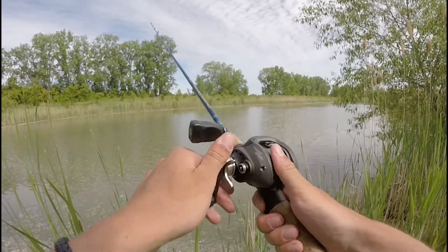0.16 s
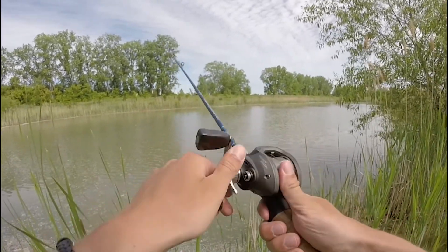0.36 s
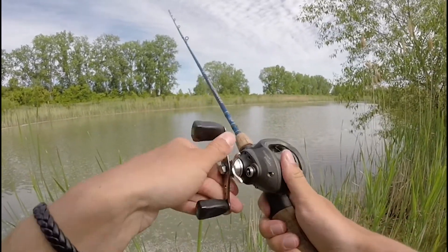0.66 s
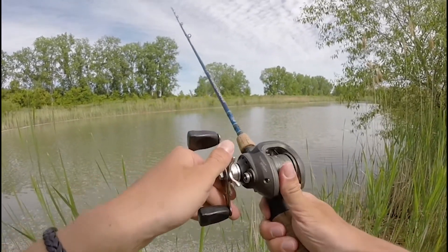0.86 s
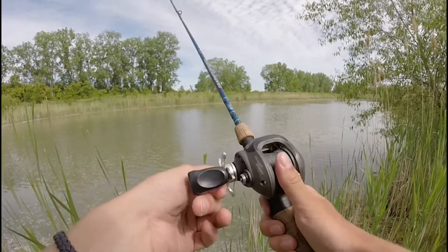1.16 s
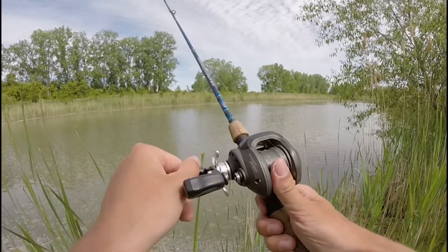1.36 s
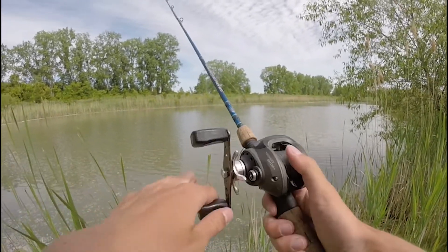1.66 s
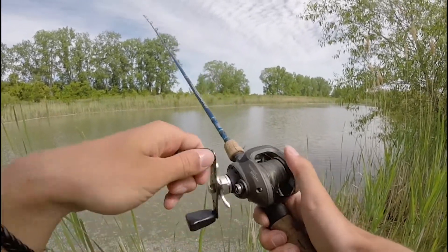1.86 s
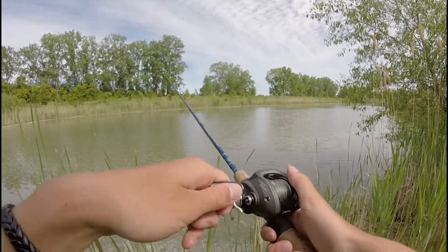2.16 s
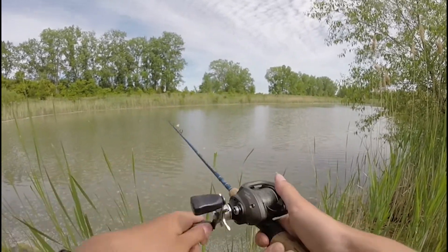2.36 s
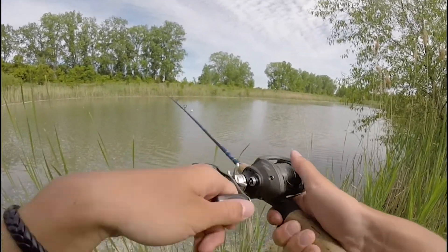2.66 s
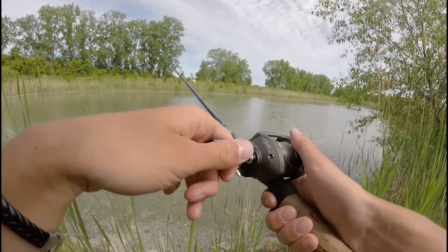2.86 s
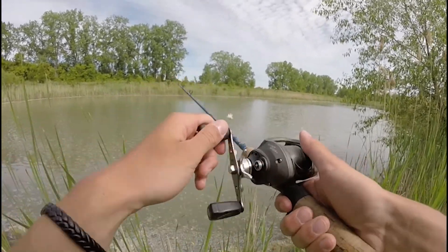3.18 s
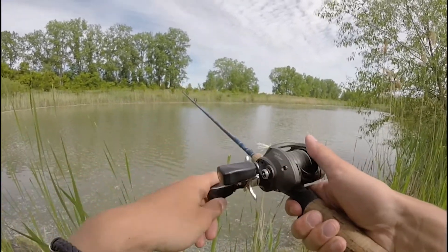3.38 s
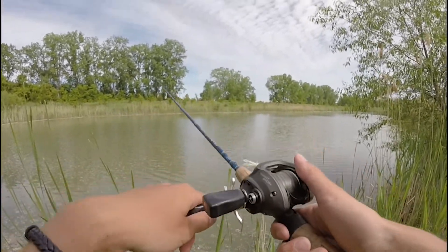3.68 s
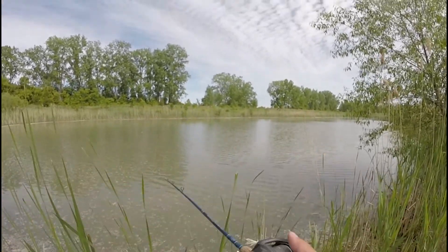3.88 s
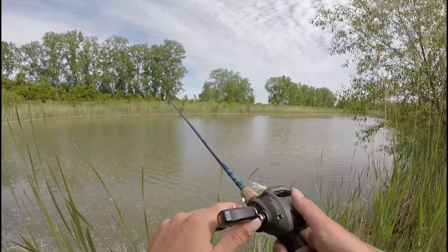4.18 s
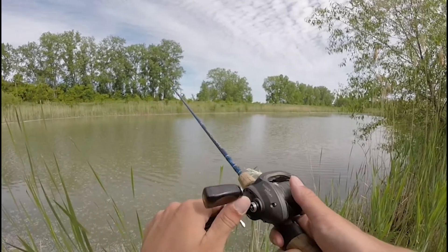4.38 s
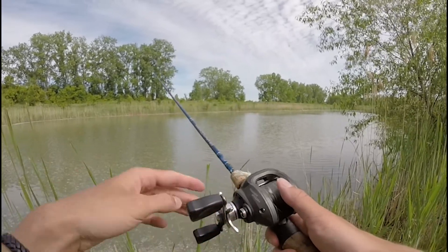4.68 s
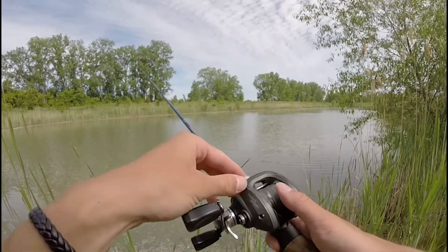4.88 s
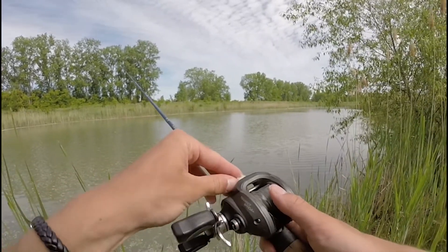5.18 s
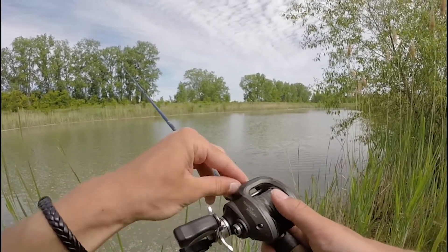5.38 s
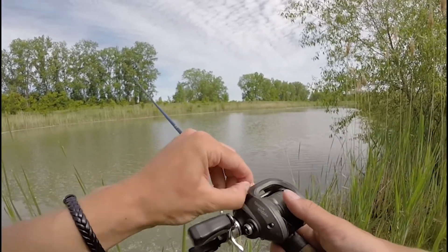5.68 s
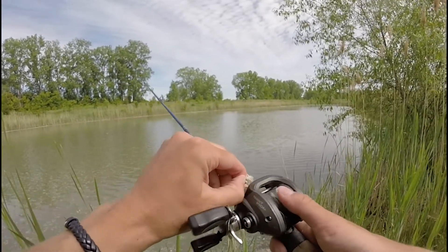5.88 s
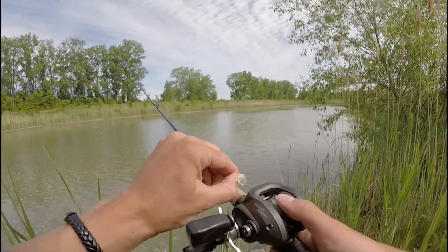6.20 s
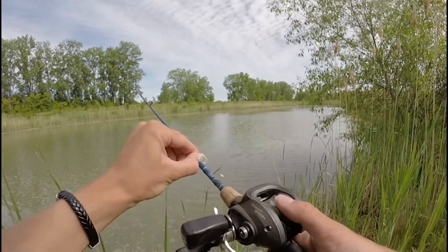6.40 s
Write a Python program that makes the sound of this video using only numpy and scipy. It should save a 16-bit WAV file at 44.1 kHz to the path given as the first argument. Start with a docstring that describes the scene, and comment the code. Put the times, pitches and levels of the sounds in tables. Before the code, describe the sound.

A close, dry outdoor scene by a pond, with soft, low-weighted air hiss throughout. A reel handle knocks against jammed gears at about 0.15, 0.4, 0.6, 0.85, 1.07 and 1.39 s; each is a short hard clack with tiny jostling, the fifth loudest with a stuttering rattle. Light ticks cluster from 1.47 to 1.63 s, then a bright, sharp snap at 1.65 s. The spool's grainy whirr grows until 2.1 s, briefly squealing thinly, and fades by about 2.6 s; a soft hollow plop sounds at 1.94 s. Line rasps faintly near 2.15 and 2.4 s. Distant birds whistle at 2.25-2.85 s. A shorter, weaker whirr and rasp come at 3.2-3.35 s. A nearer bird chirps at 4.3 and more clearly at 4.4 s. Faint ticks and thin line crackle occur near 5.0 and 5.7-5.9 s, then small bird notes from 6.1 to 6.5 s.

```python
"""At the edge of a pond, a baitcasting reel is worked by hand close to a body-worn microphone.
The handle knocks on jammed gears, the thumb bar snaps and fingers tick: strikes ring the frame's modes.
The spool whirrs and the line rasps and crackles as resonant noise; a soft plop is a short sine burst.
Small birds call in gliding tones over shaped noise, the faint hiss of air and leaves."""
import sys
import numpy as np
from scipy import signal
from scipy.fft import rfft, irfft
from scipy.io import wavfile
from scipy.ndimage import uniform_filter1d

SR = 44100
rng = np.random.default_rng(int(sys.argv[2]) if len(sys.argv) > 2 else 0)


def dump(signal):
    """Clip the signal to [-1, 1] and save it as 16-bit WAV at the path in sys.argv[1]."""
    limited = np.clip(np.atleast_2d(signal).T, -1, 1)
    pcm = np.round(limited * 32767).astype(np.int16)
    wavfile.write(sys.argv[1], SR, pcm)


N = 288458
TIME = np.arange(N) / SR


def undb(db):
    """Decibels to gain."""
    return 10 ** (np.asarray(db) / 20)


def level(x, db):
    """Set the rms level."""
    return x * undb(db) / np.sqrt(np.mean(x ** 2))


def add(out, start_s, x):
    """Mix a sound in at its start time."""
    i = int(start_s * SR)
    out[i:i + len(x)] += x[:len(out) - i]


def walk(rate):
    """Slow chance: random levels held 1 / rate s and slewed twice, rms 1."""
    hold = int(SR / rate)
    steps = np.repeat(rng.standard_normal(N // hold + 1), hold)
    slewed = uniform_filter1d(uniform_filter1d(steps, hold), hold)
    return level(slewed[:N], 0)


def colour(x, points):
    """Shape a sound's spectrum by (Hz, dB) points."""
    hz, db = np.transpose(points)
    bins_hz = np.maximum(np.arange(len(x) // 2 + 1) * SR / len(x), 1)
    gain = undb(np.interp(np.log(bins_hz), np.log(hz), db))
    return irfft(rfft(x) * gain, len(x))


def resonate(x, hz, width_hz):
    """Two-pole resonance, gain 1 at the centre."""
    return signal.lfilter(*signal.iirpeak(hz, hz / width_hz, fs=SR), x)


def noise_band(hz, width_hz, drive=1):
    """Noise of a given drive through a steep resonance."""
    noise = drive * rng.standard_normal(N)
    return resonate(resonate(noise, hz, width_hz), hz, width_hz)


def scatter(x, decay_s):
    """Dense little reflections that die away."""
    t = TIME[:SR // 3]
    echoes = rng.standard_normal(len(t)) * np.exp(-t / decay_s) * (t > .002)
    return signal.fftconvolve(x, echoes / np.linalg.norm(echoes))[:N]


def friction(rate, spread_db):
    """Dense tiny slips of uneven size, rate per second."""
    slips = rng.random(N) < rate / SR
    return slips * rng.standard_normal(N) * undb(spread_db * rng.standard_normal(N))


def swells(rows):
    """Gain over time: each row rises to its peak and falls away."""
    gain = 0
    for peak_s, attack_s, release_s, level_db in rows:
        gain = gain + undb(level_db) * np.interp(TIME - peak_s, [-attack_s, 0, release_s], [0, 1, 0])
    return gain


# spectral shape of the outdoor hiss, as density per Hz: pitch_hz, level_db
HISS_SHAPE = [(15, -7), (45, 1), (120, -3), (300, -7.5), (520, -7.5), (760, -5), (1050, -14), (1650, -24),
              (2450, -19.5), (3300, -24.5), (3800, -30.5), (4900, -31), (8000, -41), (15000, -50)]
HISS_DB = -46.5  # rms before the slow swell


def air(swell_db=-0.32, whine_hz=10350, whine_waver=.012, whine_db=-86, hum_db=-65):
    """Steady outdoor hiss as shaped noise, a faint low hum and a thin wavering whine."""
    hiss = level(colour(rng.standard_normal(N), HISS_SHAPE), HISS_DB) * undb(swell_db * walk(2.71))
    hum = noise_band(hz=167.6, width_hz=10)
    whine_pitch = whine_hz * (1 + whine_waver * walk(25) + 0.0017 * walk(500))
    whine = np.sin(2 * np.pi * np.cumsum(whine_pitch) / SR) * undb(3.4 * walk(25.11))
    return hiss + level(hum, hum_db) + level(whine, whine_db)


LEAD = SR // 50  # samples of room for sliding before each strike
# modes of the reel's frame and side plates: pitch_hz, t60_s, strike_db (relative, before tilt and scatter)
FRAME_MODES = [(160, 0.02, -26), (409, 0.039, -25), (638, 0.011, -13), (801, 0.013, -7), (1040, 0.0083, -3),
               (1296, 0.0074, -11.5), (1440, 0.007, -21.5), (2070, 0.0032, -10.5), (2434, 0.018, -11),
               (2750, 0.13, -38.5), (2865, 0.0082, -2.5), (3150, 0.011, -12.5), (4790, 0.0075, -5),
               (4994, .01, -12), (5040, 0.046, -30), (5630, 0.0084, -11), (5860, 0.012, -18.5),
               (6700, 0.0061, -9), (7100, 0.046, -44.5), (7945, .005, -12), (9700, 0.0033, -6.5),
               (10250, .004, -13), (12200, 0.0074, -19.5), (13600, 0.0023, -15.5), (13780, 0.009, -18),
               (14620, 0.0044, -25)]


def click(part_hz, treble_db, bass_db, rattle_db, rattle_s, part_db=1, part_t60=0.0078,
          contact_s=0.00053, scatter_db=3.37, grip=.1, treble_hz=3000, bass_hz=2000,
          slide_db=-16, slide_s=0.0021, snap=3, rebound_hz=8000, uneven_db=4):
    """Parts slide together, strike and chatter for a few ms; this rings the struck part and the frame."""
    t = TIME[:SR // 8]
    hz, t60, db = np.array([*FRAME_MODES, (part_hz, part_t60, part_db)]).T
    # hard contacts reach the high modes, heavy ones shake the whole frame (tilts in dB per octave)
    db = db + treble_db * np.maximum(np.log2(hz / treble_hz), 0)
    db = db + bass_db * np.maximum(np.log2(bass_hz / hz), 0)
    # the changing grip shifts the damped modes most
    db = db + scatter_db * rng.standard_normal(len(hz))
    hz = hz + grip / t60 * rng.standard_normal(len(hz))
    decays = np.exp(-np.log(1000) * np.outer(1 / t60, t))
    ring = undb(db) @ (np.sin(2 * np.pi * np.outer(hz, t)) * decays)
    ring *= 1 - np.exp(-t / contact_s)

    since = t - LEAD / SR
    grit = rng.standard_normal(len(t)) * undb(uneven_db * rng.standard_normal(len(t)))
    slide = grit * np.exp(-abs(since) / slide_s) * (since < 0)
    chatter = grit * np.exp(-abs(since) / rattle_s) * np.clip(since / 0.00033, 0, 1)
    # the rebounds are softer and duller than the strike
    duller = signal.butter(1, rebound_hz, fs=SR)
    rebounds = signal.lfilter(*duller, chatter / np.linalg.norm(chatter))
    # a hard snap comes with little sliding
    slide_gain = undb(slide_db - snap * max(treble_db, 0))
    force = slide_gain * slide / np.linalg.norm(slide) + undb(rattle_db) * rebounds
    force[LEAD] += 1  # the strike
    sound = signal.fftconvolve(force, ring)[:len(t)]
    # rms 1 over the first 3.3 ms of the strike
    return sound / np.sqrt(np.mean(sound[LEAD:LEAD + SR // 300] ** 2))


# taking up the play is a soft scrape; tilts in dB per octave
TAKE_UP_HZ, TAKE_UP_TREBLE_DB, TAKE_UP_BASS_DB = 2720, -1, 5.5
# rebounds are weaker and lower than the strike; their tilts add to the strike's
REBOUND_DB, REBOUND_FADE_DB, REBOUND_TREBLE_DB, REBOUND_BASS_DB = -8.5, -0.1, 1, 4
REBOUND_PITCH = 0.91  # share of the strike's pitch
# the handle knocks against the jammed gears (levels before the reel's bass cut): start_s, level_db,
# part pitch_hz, treble_db per octave, bass_db per octave, play_s before the strike,
# take_up_db re the strike, gap_s between rebounds, rebounds (count)
HANDLE_KNOCKS = [ (0.152, -17, 2170, 2, 5.5, .0057, -4.5, 0.0033, 1),
                 (0.3985, -19.5, 2620, -1, -6.5, .0044, -14, 0.0023, 1),
                 (0.6067, -20, 2150, 2, 3.5, .0100, -17, .002, 1),
                 (0.8542, -21, 2640, -1.5, -8, .0023, -3.5, 0.002, 1),
                 (1.0734, -13.5, 2280, -2.5, 1, 0.0053, -13, .0043, 4),
                 (1.3875, -25.5, 2780, 1, -3, .004, -9, .0058, 1)]


def knocks():
    """Each knock takes up the play in the gears, strikes and rebounds: (s, dB, sound) per contact."""
    for (start_s, level_db, pitch_hz, treble_db, bass_db,
         play_s, take_up_db, gap_s, rebounds) in HANDLE_KNOCKS:
        take_up = click(TAKE_UP_HZ, TAKE_UP_TREBLE_DB, TAKE_UP_BASS_DB, rattle_db=9, rattle_s=0.0021)
        yield start_s - play_s, level_db + take_up_db, take_up
        strike = click(pitch_hz, treble_db, bass_db, rattle_db=-9.5, rattle_s=0.0034, part_db=3,
                       part_t60=0.0064, slide_db=-9, slide_s=0.0011, snap=1.3)
        yield start_s, level_db, strike
        for k in range(round(rebounds)):
            rebound = click(REBOUND_PITCH * pitch_hz, treble_db + REBOUND_TREBLE_DB,
                            bass_db + REBOUND_BASS_DB, rattle_db=-3, rattle_s=0.0048, part_db=0)
            yield start_s + (k + 1) * gap_s, level_db + REBOUND_DB + k * REBOUND_FADE_DB, rebound


# loose gear teeth jostle before and after every knock; level in dB re the knock
JOSTLE_BEFORE_S, JOSTLE_AFTER_S, JOSTLE_DB, JOSTLE_SPREAD_DB = .035, 0.041, -29.5, 5


def jostle(count=7):
    """Faint random contacts of the gear teeth around each knock."""
    for start_s, level_db, *_ in HANDLE_KNOCKS:
        for k, (place, size) in enumerate(rng.random((count, 2))):
            offset_s = (JOSTLE_BEFORE_S + JOSTLE_AFTER_S) * (k + place) / count - JOSTLE_BEFORE_S
            touch_db = level_db + JOSTLE_DB + JOSTLE_SPREAD_DB * (2 * size - 1)
            sound = click(part_hz=2660, treble_db=-0.5, bass_db=7.5, rattle_db=1, rattle_s=0.01, part_db=4)
            yield start_s + offset_s, touch_db, sound


# distant birds whistle short, slightly arched glides (levels before flutter and dulling):
# start_s, length_s, level_db, start_hz, end_hz
BIRD_WHISTLES = [ (.198, 0.029, -62, 4300, 4300), (0.823, .03, -64, 5150, 5600),
                 (.925, 0.045, -63, 4200, 5050), (2.25, 0.13, -52.5, 2610, 2870),
                 (2.489, 0.048, -62, 3280, 3410), (2.615, 0.063, -57, 2750, 2800),
                 (2.76, 0.041, -57, 2630, 2800), (2.806, 0.085, -61, 3330, 2830),
                 (6.11, .13, -72, 7330, 7350), (6.28, .055, -57, 3460, 3380),
                 (6.343, .028, -65, 4120, 4230), (6.412, 0.033, -58.5, 5280, 5150),
                 (6.48, 0.059, -55, 3430, 3376)]
WHISTLE_ARCH = 0.0113  # share by which the pitch lifts in mid-note
# a nearer bird chirps up and down (levels before flutter and dulling):
# start_s, rise_s, fall_s, level_db, start_hz, top_hz, end_hz, octave_db re the fundamental
BIRD_CHIRPS = [(4.29, 0.016, 0.029, -57.5, 3340, 3770, 3450, 8.5),
               (4.41, 0.044, 0.016, -46, 3700, 7260, 4800, -18)]
OVERTONE_STEP_DB = -8  # from the octave up, each harmonic is this much weaker


def notes():
    """Every bird note as (s, pitch glide Hz, levels of the harmonics dB)."""
    for start_s, length_s, level_db, start_hz, end_hz in BIRD_WHISTLES:
        u = np.linspace(0, 1, int(length_s * SR))
        glide = start_hz + (end_hz - start_hz) * u
        yield start_s, glide * (1 + WHISTLE_ARCH * np.sin(np.pi * u)), [level_db]
    for start_s, rise_s, fall_s, level_db, start_hz, top_hz, end_hz, octave_db in BIRD_CHIRPS:
        up = start_hz + (top_hz - start_hz) * np.sin(np.linspace(0, np.pi / 2, int(rise_s * SR)))
        down = top_hz + (end_hz - top_hz) * np.linspace(0, 1, int(fall_s * SR)) ** 2
        # only harmonics that stay below half the sample rate
        overtones = [level_db + octave_db + k * OVERTONE_STEP_DB
                     for k in range(3) if (k + 2) * top_hz < SR / 2]
        yield start_s, np.concatenate([up, down]), [level_db] + overtones


def birds(flutter_db=2, echo_db=-14, echo_s=0.014, rough=0.055, waver_hz=25, air_hz=9500):
    """Gliding whistles and chirps, dulled by distance and blurred by the trees."""
    out, waver, flutter = np.zeros(N), walk(900), undb(flutter_db * walk(200))
    for start_s, glide_hz, harmonics in notes():
        span = (np.arange(len(glide_hz)) + int(start_s * SR)) % N
        # the wider the sweep, the rougher the note
        pitch_hz = glide_hz + (waver_hz + rough * np.ptp(glide_hz)) * waver[span]
        phase = 2 * np.pi * np.cumsum(pitch_hz) / SR
        note = sum(undb(db) * np.sin(k * phase) for k, db in enumerate(harmonics, 1))
        add(out, start_s, note * flutter[span] * signal.windows.tukey(len(phase), .3))
    out = signal.lfilter(*signal.butter(2, air_hz, fs=SR), out)
    return out + undb(echo_db) * scatter(out, echo_s)


# light ticks of loose parts and fingers on the housing (levels before the reel's bass cut):
# start_s, level_db, pitch_hz, treble_db per octave, bass_db per octave, rattle_db
HOUSING_TICKS = [ (.4305, -46, 2650, 0, -3, -16), (.776, -44, 2480, -2, 6, -4), (.844, -43, 5100, 9, 0, -5),
                 (1.024, -35, 2600, -4, 1, 8), (1.0551, -26.5, 1190, -6, -4, -1),
                 (1.061, -25.5, 2900, 2.5, -5, -21), (1.339, -51, 5100, 11, -3, -10),
                 (1.4726, -35.5, 2740, 3, 6.5, 8.5), (1.5397, -40, 2620, 3, -2, -5),
                 (1.5549, -38.5, 2740, 1, 3, -3), (1.574, -32, 2780, -3, -1, -7),
                 (1.596, -43, 2720, -2, 4, -1), (1.628, -45, 3020, 1, 2, 10),
                 (1.7056, -40.5, 2760, 1, 6.5, 14), (2.2464, -40, 5040, -1.5, -5.5, -4),
                 (4.1016, -51, 2730, 4.5, 5, 5), (4.1429, -37, 4800, -1.5, 2, -23),
                 (4.996, -42.5, 2680, -1.5, 7.5, -9), (5.0017, -42.5, 2700, -1, 6, -9.5),
                 (5.6964, -38, 790, 4, 4, -6), (5.709, -40, 5130, 3.5, 7, -23)]


def ticks():
    """Single light contacts: a short slide, a touch and a little rattle."""
    for start_s, level_db, pitch_hz, treble_db, bass_db, rattle_db in HOUSING_TICKS:
        sound = click(pitch_hz, treble_db, bass_db, rattle_db, rattle_s=0.0061, part_db=-1.5,
                      part_t60=.008, slide_db=-9.5, slide_s=.0025, snap=1)
        yield start_s, level_db, sound


SNAP_S = 1.6472
# the thumb bar snaps through its linkage (levels before the bass cuts): delay_s, level_db,
# part pitch_hz, ring_db of the part before tilt, t60_s, treble_db per octave, bass_db per octave
SNAP_PARTS = [(0, -21.5, 13100, 20, 0.0025, 8, -3.5), (.0003, -13.5, 6300, -4, .004, 4.5, -3.5),
              (.0009, -19.5, 2400, 7, .011, -1, 0), (.0014, -20, 1034, 4, 0.0097, -1, 0.5)]


def snap(radiate_hz=330):
    """The thumb bar and the parts it throws strike one after another; small parts radiate little bass."""
    small = signal.butter(2, radiate_hz, "high", fs=SR)
    for delay_s, level_db, pitch_hz, ring_db, t60_s, treble_db, bass_db in SNAP_PARTS:
        sound = click(pitch_hz, treble_db, bass_db, rattle_db=-5, rattle_s=0.0054, part_db=ring_db,
                      part_t60=t60_s, scatter_db=3.5, grip=0.051)
        yield SNAP_S + delay_s, level_db, signal.lfilter(*small, sound)


def reel(scatter_db=-20, scatter_s=0.0088, radiate_hz=130):
    """All the clicks, with a faint short scatter from arms, rod and reeds."""
    out = np.zeros(N)
    for strike_s, level_db, sound in [*knocks(), *snap(), *ticks(), *jostle()]:
        add(out, strike_s - LEAD / SR, undb(level_db) * sound)
    # so small a body radiates little bass
    out = signal.lfilter(*signal.butter(1, radiate_hz, "high", fs=SR), out)
    return out + undb(scatter_db) * scatter(out, scatter_s)


# the whirr grows as a power of the run
WHIRR_POWER = 0.59
# the spool runs up and coasts down: start_s, run_up_s, coast_s (time constant),
# top speed 0-1, level_db at top speed
SPOOL_SPINS = [(1.67, 0.44, 0.18, 1, -44.5), (3.19, 0.13, 0.021, .5, -46.5)]


def spin():
    """Speed of the spool and loudness of its whirr: a steady run-up, then friction slows it."""
    speed = loudness = 0
    for start_s, run_up_s, coast_s, top, level_db in SPOOL_SPINS:
        rise = np.clip((TIME - start_s) / run_up_s, 0, 1)
        run = rise * np.exp(-np.maximum(TIME - start_s - run_up_s, 0) / coast_s)
        speed = speed + top * run
        loudness = loudness + undb(level_db) * run ** WHIRR_POWER
    return speed, loudness


# the bearing fades in above a threshold speed, over a range of speed; rms level before that fade
SQUEAL_SPEED, SQUEAL_ONSET, SQUEAL_DB = .62, 0.11, -62
# resonances that the spool drives: pitch_hz, width_hz, level_db (relative)
SPOOL_RESONANCES = [(748, 760, 3), (1303, 910, -13.5), (2167, 630, -6), (2773, 610, 0), (3315, 400, -14),
                    (4450, 600, -17), (4890, 650, -13), (6500, 820, -19), (9280, 3300, -26),
                    (13530, 1700, -25.5)]


def spool(turn_hz=75, pulsing=0.083, grain_db=3.0, squeal_hz=7040, squeal_width_hz=420, squeal_flicker_db=3):
    """Line and bearings scrape with a pulse that wanders about one rate; at speed a bearing sings."""
    speed, loudness = spin()
    turn = np.cumsum(turn_hz * (1 + .08 * walk(8.8))) / SR
    scrape = (1 + pulsing * np.sin(2 * np.pi * turn)) * undb(grain_db * walk(600))
    whirr = sum(undb(db) * noise_band(hz, width, scrape) for hz, width, db in SPOOL_RESONANCES)
    squeal = noise_band(squeal_hz, squeal_width_hz, scrape) * undb(squeal_flicker_db * walk(50))
    singing = np.clip((speed - SQUEAL_SPEED) / SQUEAL_ONSET, 0, 1)
    return level(whirr, 0) * loudness + level(squeal, SQUEAL_DB) * singing


PLOP_S = 1.939


def plop(hz=540, length_s=0.0032, peak_db=-27):
    """A soft hollow plop: a sine a few cycles long under a bell-shaped envelope."""
    t = TIME - PLOP_S
    return undb(peak_db) * np.exp(-(t / length_s) ** 2) * np.sin(2 * np.pi * hz * t)


# the line drags over the reel's guide: peak_s, attack_s, release_s, level_db
GUIDE_RASPS = [(2.16, .25, 0.054, -62), (2.38, .17, .09, -60), (3.31, .06, .05, -59.5)]
# fingers slide on the line: peak_s, attack_s, release_s, level_db
FINGER_SLIDES = [(4.99, 0.044, .03, -62), (5.82, 0.069, .06, -67), (5.92, .03, .02, -68)]


def line(rasp_hz=5050, rasp_width_hz=700):
    """The line rasps in small slips over the guide; later it crackles thinly between the fingertips."""
    drag = friction(rate=890, spread_db=5.0)
    rasp = resonate(resonate(drag, rasp_hz, rasp_width_hz), rasp_hz, rasp_width_hz)
    slips = friction(rate=700, spread_db=6)
    crackle = resonate(slips, hz=9000, width_hz=6000)
    return level(rasp, 0) * swells(GUIDE_RASPS) + level(crackle, 0) * swells(FINGER_SLIDES)


def scene():
    """The reel in the hands, the pond around it."""
    return (reel() + spool() + line() + plop() + birds() + air())[None]


TOP_HZ = 15300


def record(dry):
    """The recorder clips at full scale and cuts the top."""
    cut = signal.ellip(8, .2, 70, TOP_HZ, fs=SR, output="sos")
    return signal.sosfilt(cut, np.clip(dry, -1, 1))


dry = scene()
out = record(dry)
dump(out)
```